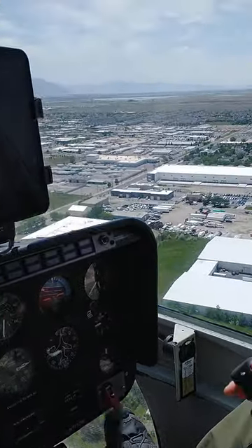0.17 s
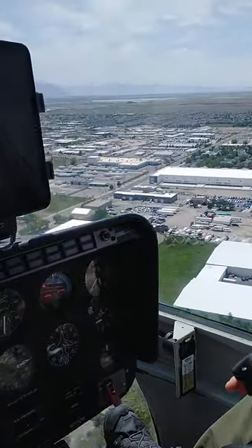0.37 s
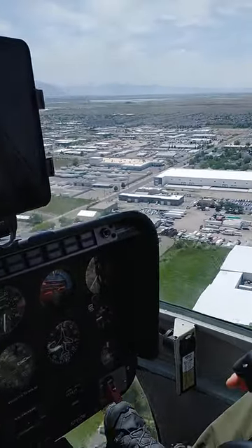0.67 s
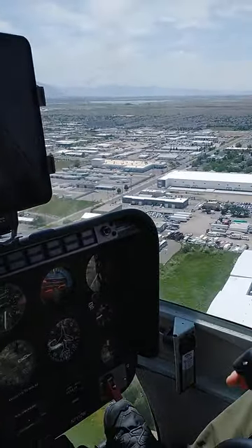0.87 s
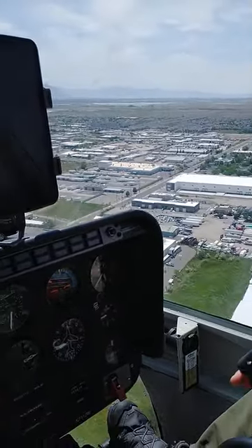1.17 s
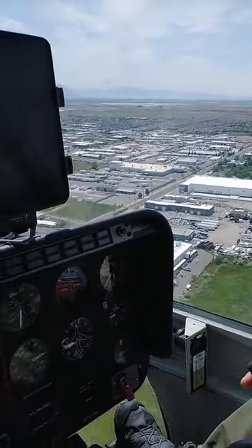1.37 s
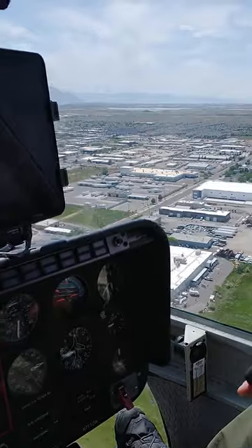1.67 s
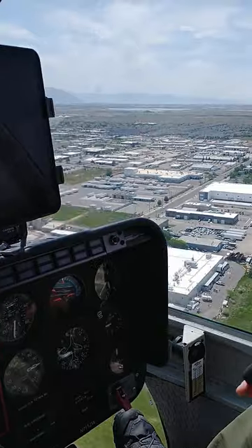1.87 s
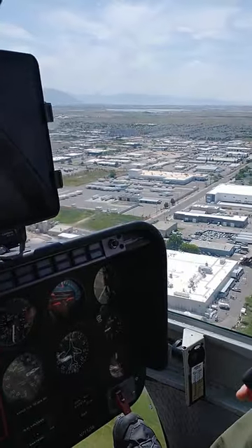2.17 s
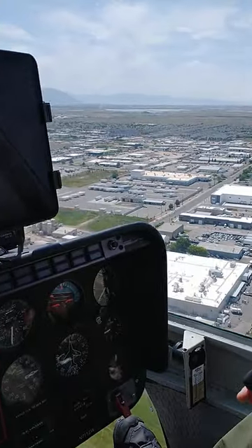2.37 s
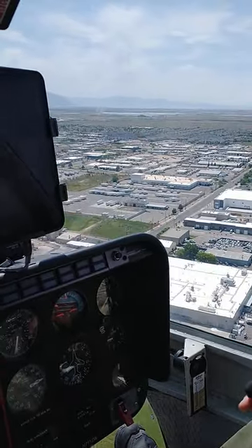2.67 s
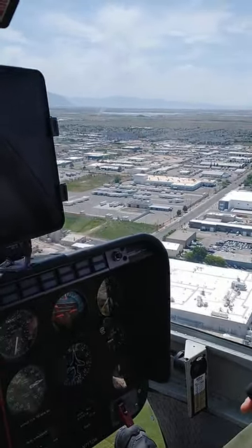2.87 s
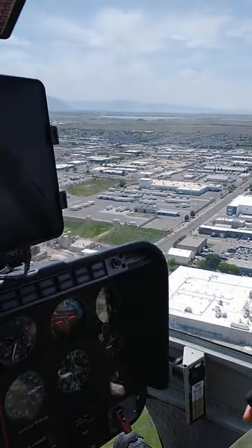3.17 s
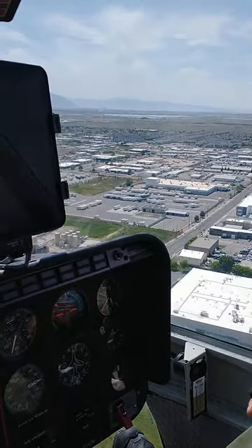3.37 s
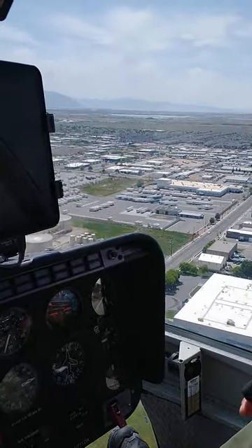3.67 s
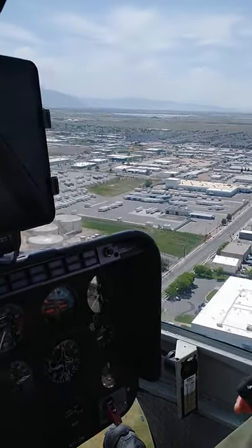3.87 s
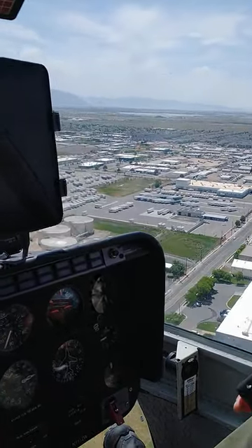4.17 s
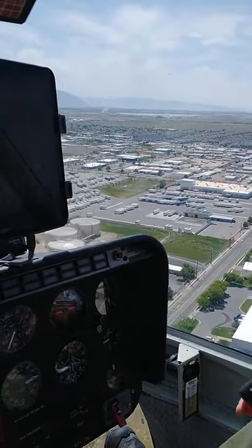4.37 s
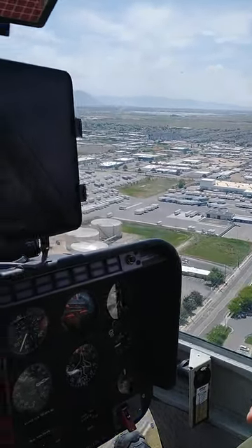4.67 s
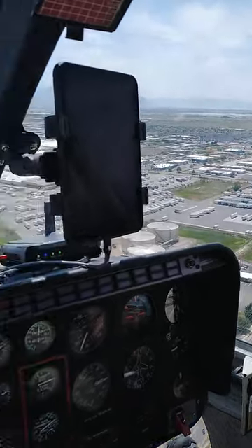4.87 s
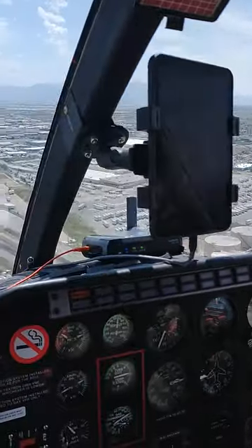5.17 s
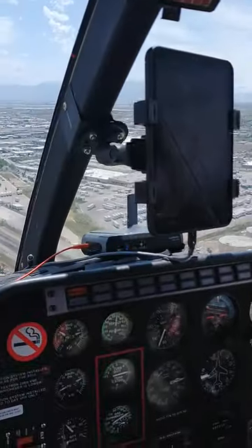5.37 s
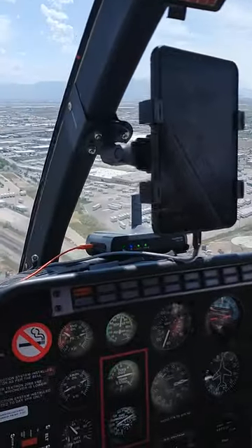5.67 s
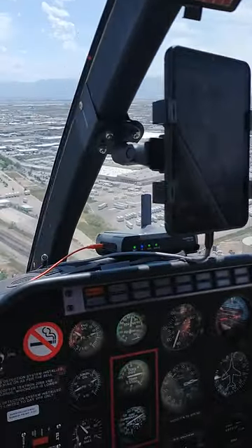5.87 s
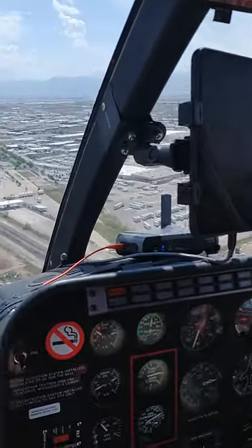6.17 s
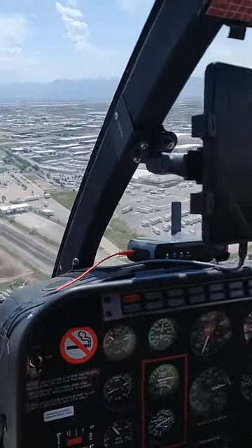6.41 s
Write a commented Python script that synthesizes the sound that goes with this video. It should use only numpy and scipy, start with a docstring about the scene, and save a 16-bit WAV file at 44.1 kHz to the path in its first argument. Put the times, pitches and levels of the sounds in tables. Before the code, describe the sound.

From start to finish, about six and a half seconds, a turbine helicopter is heard in steady flight from inside its doors-off cabin. The loudest sound is a deep, hollow wind boom with rushing air above it. The main rotor adds a low flutter, about thirteen beats a second, each bringing a gust of hiss and a very high rising whistle toward the left. Underneath run a low tail rotor drone and throbbing mid-pitched gear tones. A high gearbox whine wavers, swelling briefly near 0 and 1 seconds, most strongly on the right around 4.7 to 5, and again near 5.6 and 6. A faint, thin turbine scream sits on the right and eases after 2 seconds. Around 5 seconds the listener turns left: the whistle softens and the gear hum grows louder, mostly in the right ear, staying there until the end.

```python
"""Inside a turbine helicopter flying with its doors off. Moving air makes the cabin boom, and each
pass of the two main blades sends a deep flutter, a gust of hiss and a rising whistle past the door
frame. The spinning tail rotor, gears and turbine add steady tones. Near the end the listener turns
left, and the hum of the gears grows louder, mostly in the right ear."""
import sys
import numpy as np
from scipy import signal
from scipy.fft import rfft, irfft, next_fast_len
from scipy.io import wavfile
from scipy.ndimage import uniform_filter1d, map_coordinates

SR = 44100
rng = np.random.default_rng(int(sys.argv[2]) if len(sys.argv) > 2 else 0)


def log_audio(samples):
    """Write samples as a 16-bit WAV file to the path given in sys.argv[1]."""
    # one column per channel
    frames = np.atleast_2d(samples).T
    # limit to full scale, then quantise
    limited = np.clip(frames, -1, 1)
    pcm = np.round(limited * 32767).astype(np.int16)
    wavfile.write(sys.argv[1], SR, pcm)


N = 288414
T = np.arange(N) / SR


def amp(db):
    """Turn decibels into a number to multiply a sound by."""
    return 10 ** (np.asarray(db) / 20)


def unit(x):
    """Scale a sound to an average strength (rms) of 1."""
    return x / np.sqrt(np.mean(x ** 2) + 1e-20)


def along(points, hz):
    """Read between (pitch_hz, value) points, giving each octave about equal room."""
    point_hz, values = np.transpose(points)
    return np.interp(np.log(hz + 1), np.log(point_hz + 1), values)


def curves(rows):
    """Join (time_s, value, ...) rows with straight lines: one curve per value column."""
    times_s, *columns = np.transpose(rows)
    return [np.interp(T, times_s, column) for column in columns]


def wobble(rate):
    """A smooth curve through `rate` random points a second."""
    return map_coordinates(rng.standard_normal(int(N * rate / SR) + 4), [T * rate])


def filtered(x, response):
    """Turn each frequency of x up or down by response(hz)."""
    size = next_fast_len(N + SR // 2)
    return irfft(rfft(x, size) * response(np.fft.rfftfreq(size, 1 / SR)), size)[..., :N]


def panned(x, pan_db):
    """Make the left side louder than the right by pan_db."""
    return x * np.array([amp(pan_db / 2), amp(-pan_db / 2)]).reshape(2, -1)


def air_noise(spectrum, patchy_db):
    """Swirling air: stereo noise with random louder and softer patches."""
    # How alike the two ears hear the air: pitch_hz, likeness (1 = the same, 0 = unrelated)
    likeness = [(30, 0.98), (130, 0.98), (220, 0.95), (330, 0.68), (500, 0.54), (1000, -0.12),
                (2000, -0.094), (8000, -0.014)]
    slices = signal.stft(rng.standard_normal((2, N)), nperseg=512)[2]
    patches = uniform_filter1d(rng.standard_normal(slices.shape[1:]), size=8, axis=0)
    patches = uniform_filter1d(patches, size=6, axis=1)
    pair = signal.istft(slices * amp(patchy_db * unit(patches)), nperseg=512)[1][:, :N]

    def response(hz):
        width = np.arccos(np.clip(along(likeness, hz), -1, 1)) / 2
        return amp(along(spectrum, hz)) * [np.cos(width), np.sin(width)]

    mid, side = filtered(pair, response)
    return unit(np.array([mid + side, mid - side]))


def cycles(hz):
    """Count the cycles gone by at a changing frequency."""
    return np.cumsum(hz) / SR


def tone(hz, scatter_hz, spread):
    """A pure stereo note that wanders in pitch; the left leads by `spread` radians."""
    phase = 2 * np.pi * cycles(hz + scatter_hz * wobble(20))
    return np.sqrt(2) * np.sin([phase + spread / 2, phase - spread / 2])


def breathy_note(centre_hz, width_hz):
    """A narrow band of stereo noise that follows centre_hz."""
    noise = filtered(rng.standard_normal((2, 2, N)), lambda hz: 1 / (1 + (hz / width_hz) ** 2))
    phase = 2 * np.pi * cycles(centre_hz)
    return unit(noise[0] * np.cos(phase) + noise[1] * np.sin(phase))


def swell(passes, at, sharp, lean=0):
    """A smooth bump of height 1 in each blade pass; lean makes it rise faster than it falls."""
    angle = 2 * np.pi * (passes - at)
    return np.exp(sharp * (np.cos(angle - lean * (1 - np.cos(angle))) - 1))


def cabin_air():
    """The open cabin booms like a blown bottle, and air rushes round the frame."""
    # Low-to-high balance of the boom and of the rush: pitch_hz, relative_db
    boom_spectrum = [(20, -28), (34, -39), (45, -16), (55, -6.5), (80, -7), (105, -4), (135, 0.5),
                     (155, -6.5), (180, -8), (225, -5), (290, -14), (400, -23), (800, -58)]
    rush_spectrum = [(150, -32), (290, -1), (380, -1), (500, -3), (650, -5.5), (850, -8), (1100, -11.5),
                     (1600, -15), (2300, -18.5), (3200, -21), (6000, -55)]
    # How the boom rises and falls: time_s, relative_db
    boom_levels = [(0, -15), (2.9, -14), (4.4, -13.5), (5.5, -14.5), (6.54, -15)]
    boom_db, = curves(boom_levels)
    boom = amp(boom_db - 1.5) * air_noise(boom_spectrum, patchy_db=.5)
    bottle_note = amp(boom_db - 8.5 + 3 * wobble(9)) * tone(135, scatter_hz=7.04, spread=.062)
    rush = amp(-22.5) * air_noise(rush_spectrum, patchy_db=1.5)
    return panned(boom + bottle_note, pan_db=-1.2) + panned(rush, pan_db=-1.1)


def rotor_beat(passes):
    """Each blade pushes out a wave of pressure, felt as a deep flutter."""
    # Notes in the flutter: cycles_per_pass, level_db
    notes = [(2, -57), (3, -46), (4, -35), (5, -37)]
    return sum(amp(db + 1.8 * wobble(2.9)) * np.sqrt(2) * np.sin(2 * np.pi * per_pass * passes)
               for per_pass, db in notes)


def blade_wash(passes):
    """Passing air hisses, and every blade adds a brighter gust that peaks in a short spit."""
    # Low-to-high balance of the hiss and of the gusts: pitch_hz, relative_db
    hiss_spectrum = [(1200, -43), (2500, -14.5), (3200, 0.5), (4200, -1.5), (6000, 1), (8500, -1),
                     (10000, -1.5), (11500, -7.5), (13500, -11), (16000, -23.5)]
    gust_spectrum = [(1500, -24), (2600, -7), (3300, -1), (4500, 1), (6500, 2), (9500, 0.5), (11500, -2.5),
                     (13500, -4), (16000, -3.5)]
    # Loudness of the hiss: time_s, level_db
    hiss_levels = [(0, -24), (3, -23.5), (4.2, -22), (5.6, -23), (6.54, -23.5)]
    hiss = amp(curves(hiss_levels)[0]) * air_noise(hiss_spectrum, patchy_db=1.16)
    push = swell(passes, at=.0053, sharp=.77)
    spit = .18 * swell(passes + .03 * wobble(14), at=.0067, sharp=9)
    strength = unit((push + spit) * amp(.77 * wobble(13)))
    return hiss + amp(-25) * strength * air_noise(gust_spectrum, patchy_db=2)


def edge_whistle(passes):
    """Air whistles on the door frame, rising with each gust and higher under one of the two blades."""
    # The whistle as it follows the airflow: time_s, middle_pitch_hz, relative_db
    whistle = [(0, 8760, -16.5), (2.4, 9140, -16), (2.87, 7790, -18.5), (3.2, 8660, -16),
               (4.5, 9580, -20.5), (5, 8900, -28.5), (5.6, 9250, -24.5), (6.1, 8950, -20),
               (6.54, 8550, -21.5)]
    middle_hz, db = curves(whistle)
    blade = -np.cos(np.pi * (passes + .2))  # +1 for one blade, -1 for the other
    sweep = 1 + .085 * np.sin(2 * np.pi * (passes + .19))
    pitch_hz = middle_hz * (1 + .05 * blade + .015 * wobble(25)) * sweep
    gust = amp(db + .7 * wobble(10)) * swell(passes, at=-.21, sharp=2.24, lean=.41)
    # a ragged note inside a broad puff; one blade gives more note, the other more puff
    note = amp(-5.5 + blade + 2 * wobble(110))
    note = note * breathy_note(pitch_hz * (1 + .022 * wobble(150)), width_hz=360)
    puff = amp(-3.5 - 1.2 * blade + .89 * wobble(60)) * breathy_note(pitch_hz - 300, width_hz=1260)
    # between blades a softer whistle sinks as the air slows
    sinking_hz = 8400 * (1 - .073 * np.sin(2 * np.pi * (passes - .5)))
    lull = amp(-32 + 2.1 * wobble(14)) * swell(passes, at=.47, sharp=2.7, lean=.2)
    soft_whistle = lull * breathy_note(sinking_hz, width_hz=790)
    return panned(gust * (note + puff), pan_db=7) + panned(soft_whistle, pan_db=15)


def shaft_and_tail_rotor(speed):
    """The spinning drive shaft and tail rotor drone on low notes."""
    # Their notes at average speed: pitch_hz, level_db
    notes = [(168, -38), (197.8, -23.5), (252, -34.5), (278, -39.5), (336, -34.5), (396, -51.5),
             (420, -48.5), (504, -48.5)]
    return sum(amp(db + 2.5 * wobble(5)) * tone(hz * speed, scatter_hz=.78, spread=-.1)
               for hz, db in notes)


def planet_gear_hum(passes, turn_middle_s=4.95, turn_lasts_s=1):
    """Gears circling a central gear hum on three notes that fall into step just before each blade."""
    # Notes of the meeting teeth: cycles_per_pass, left_db, right_db (both added to the hum's level)
    notes = [(49, -.5, -8), (50, -16, -1.5), (51, -22, -13)]
    # The hum's level before and after the listener turns left: left_db, right_db
    ahead_db = [-30, -37]
    turned_db = [-27.5, -27]
    turned = .5 + .5 * np.tanh(2 * (T - turn_middle_s) / turn_lasts_s)  # goes from 0 to 1
    level = amp(np.outer(ahead_db, 1 - turned) + np.outer(turned_db, turned))
    wander = .37 * wobble(11)
    hum = 0
    for per_pass, left_db, right_db in notes:
        note = np.sqrt(2) * np.sin(2 * np.pi * per_pass * (passes + .1201) + wander)
        hum += level * amp([[left_db], [right_db]]) * note
    return hum


def gear_throb(speed, passes):
    """The other gears sing higher and throb as each blade puts a load on them."""
    # Gear notes: pitch_hz, left_db, right_db, throb_db, loudest_at (fraction of a blade pass)
    notes = [(973, -55, -44, 1, .2), (1258, -46, -52, 1, .3), (1271, -47, -51, 1, .3),
             (1283.6, -39, -40.5, 3.5, .36), (1481, -55, -54, 1, .2), (1679, -53, -51, 1, .1),
             (1849, -52, -52, 1, .2), (1875, -44.5, -38.7, 1.5, .2), (1918, -53, -55, 1, .2),
             (1945, -60, -51, 1, .2)]
    # Slow change added to all these notes: time_s, left_db, right_db
    level_changes = [(0, -1, 3), (1.4, 0.5, 1.5), (2.8, 1, -2), (6.54, 1, 0)]
    level = amp(curves(level_changes))
    gears = 0
    for hz, left_db, right_db, throb_db, loudest_at in notes:
        load_db = throb_db * np.cos(2 * np.pi * (passes - loudest_at))
        throb = unit(amp(load_db + 1.3 * wobble(7) + 1.6 * wobble(45)))
        note = tone(hz * speed, scatter_hz=1.3, spread=-.47)
        gears += level * throb * amp([[left_db], [right_db]]) * note
    return gears


def gearbox_whine(hz, fade_db=2.5, fades_per_s=5.1):
    """Gear teeth whine; the listener moves through the sound's loud and quiet spots (standing waves)."""
    # The whine between swells: left_db, right_db
    resting_db = [-44, -36]
    # Swells added at the loud spots: middle_s, half_length_s, left_db, right_db
    swells = [(.12, .14, -31, -52), (1.15, 0.22, -60, -31), (2.45, 0.19, -49, -37), (4.76, 0.16, -42, -23),
              (4.973, 0.23, -41, -21), (5.63, 0.19, -55, -26.5), (6.047, 0.18, -28, -32)]
    gain = amp([db + fade_db * wobble(fades_per_s) for db in resting_db])
    for middle_s, half_length_s, left_db, right_db in swells:
        gain += amp([[left_db], [right_db]]) * np.exp(-((T - middle_s) / half_length_s) ** 2)
    direct = gain * amp(1.4 * wobble(20)) * tone(hz, scatter_hz=1.5, spread=1.1)
    # sound scattered by the swirling air mixes in, so the whine flutters most where it is weak
    scattered = amp(-37) * breathy_note(hz, width_hz=26)
    return direct + panned(scattered, pan_db=-8)


def turbine(pitch_hz=12570.):
    """The fan that squeezes air into the engine gives a thin, slightly fuzzy scream."""
    # Loudness of the scream: time_s, level_db
    levels = [(0, -42), (1.2, -41), (2.2, -45), (6.54, -48)]
    scream = amp(curves(levels)[0]) * breathy_note(np.full(N, pitch_hz), width_hz=45)
    return panned(scream, pan_db=-8)


def scene():
    """Add up air and machinery; rotor, shaft and gears speed up and slow down together."""
    # Speed of the machinery, heard as the pitch of the gearbox whine: time_s, pitch_hz
    whine_pitches = [(0, 4936), (1.25, 4930), (2.45, 4947), (3, 4942), (4.1, 4924), (4.7, 4926),
                     (5.7, 4947), (6.54, 4946)]
    passes_per_s, first_pass_s = 12.966, .066
    whine_hz, = curves(whine_pitches)
    speed = whine_hz / whine_hz.mean()
    passes = cycles(passes_per_s * speed) - passes_per_s * first_pass_s  # counts the blades going by
    air = cabin_air() + rotor_beat(passes) + blade_wash(passes) + edge_whistle(passes)
    machinery = shaft_and_tail_rotor(speed) + planet_gear_hum(passes) + gear_throb(speed, passes)
    return air + machinery + gearbox_whine(whine_hz) + turbine()


def record(dry):
    """A fast volume control evens out the bass; the tallest peaks are rounded and the very top is cut."""
    bass_hz, top_hz, peak_limit = 400, 15850, .9
    bass = filtered(dry, lambda hz: 1 / (1 + (hz / bass_hz) ** 4))
    power = np.abs(uniform_filter1d(np.mean(bass ** 2, axis=0), size=900))
    gain = uniform_filter1d((power / power.mean() + .05) ** -.27, size=500)
    even = dry + bass * (gain - 1)
    rounded = even / (1 + (even / peak_limit) ** 8) ** (1 / 8)
    return filtered(rounded, lambda hz: hz < top_hz)


dry = scene()
out = record(dry)
log_audio(out)
```